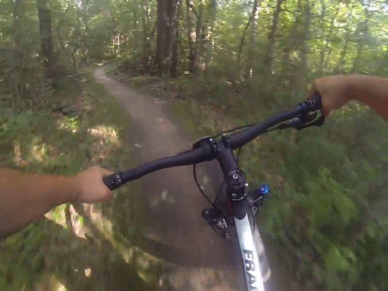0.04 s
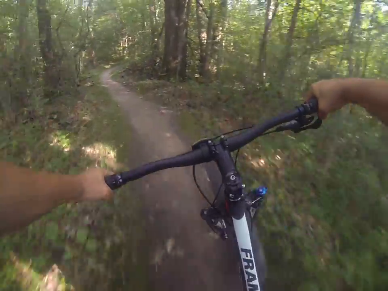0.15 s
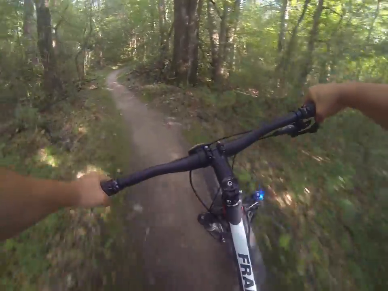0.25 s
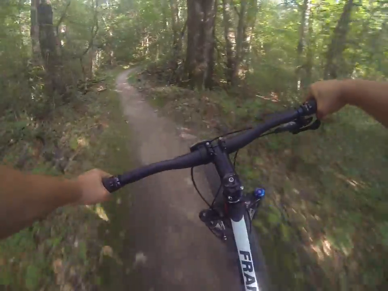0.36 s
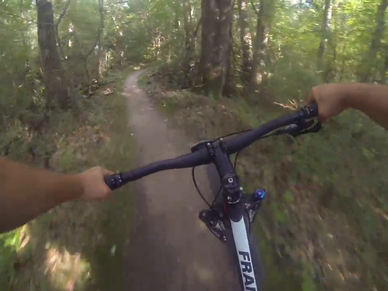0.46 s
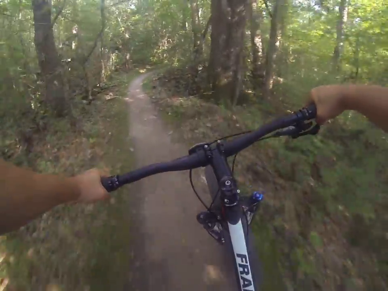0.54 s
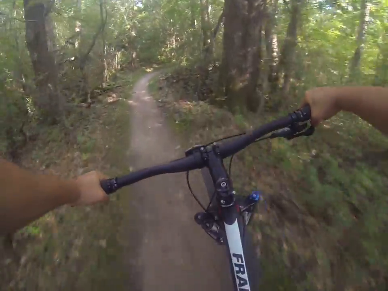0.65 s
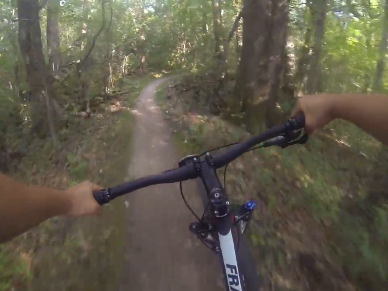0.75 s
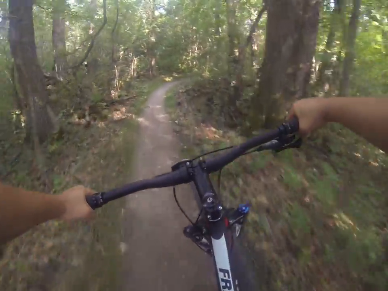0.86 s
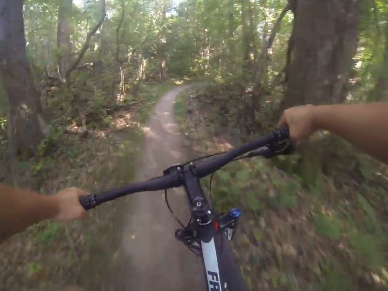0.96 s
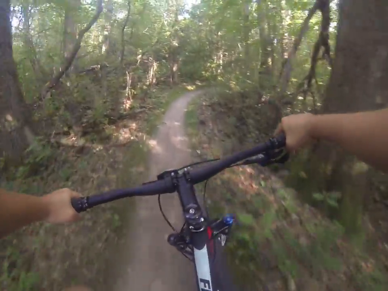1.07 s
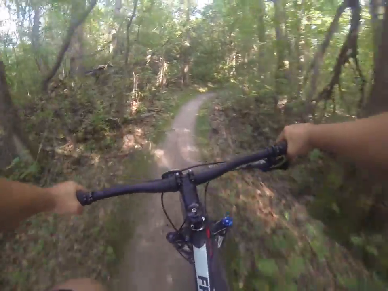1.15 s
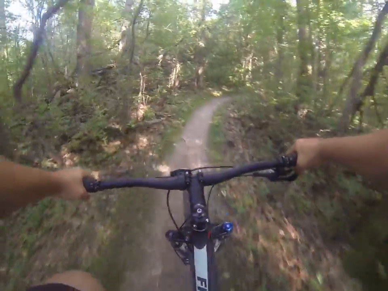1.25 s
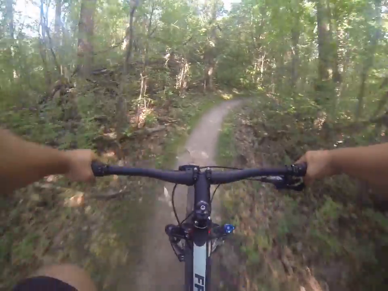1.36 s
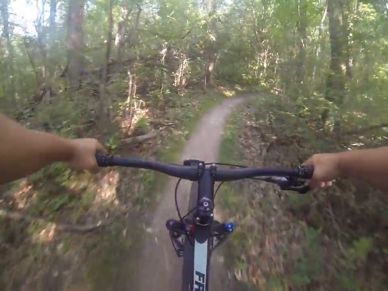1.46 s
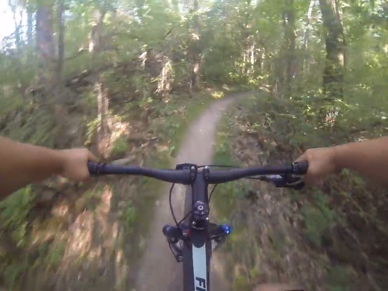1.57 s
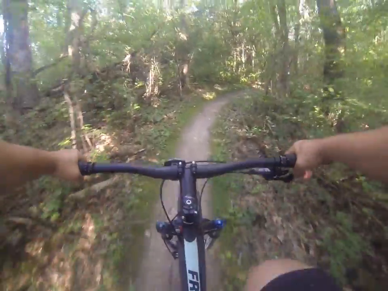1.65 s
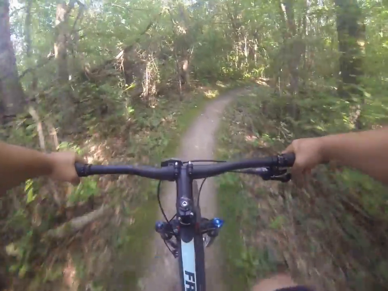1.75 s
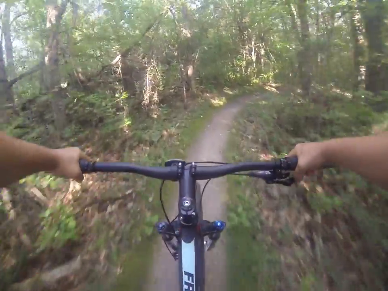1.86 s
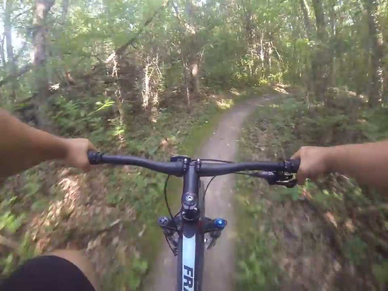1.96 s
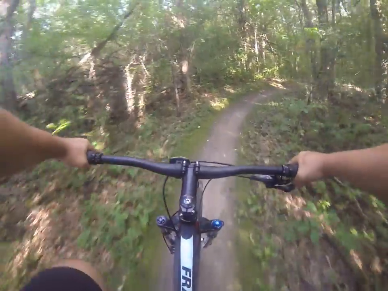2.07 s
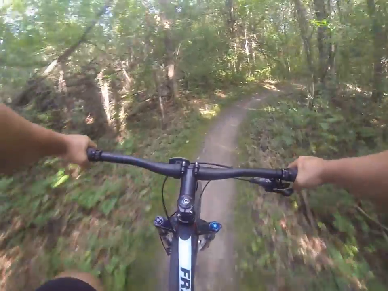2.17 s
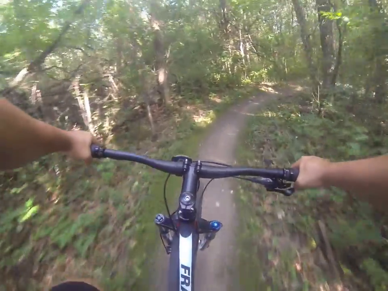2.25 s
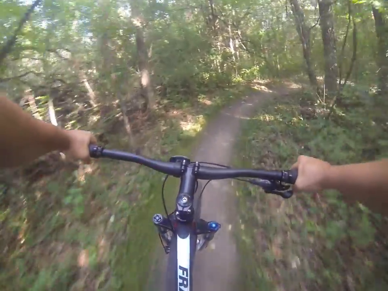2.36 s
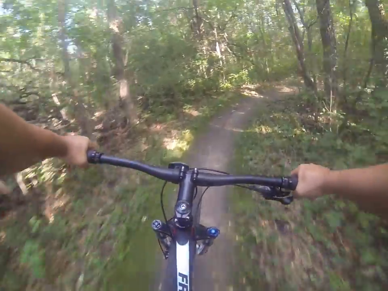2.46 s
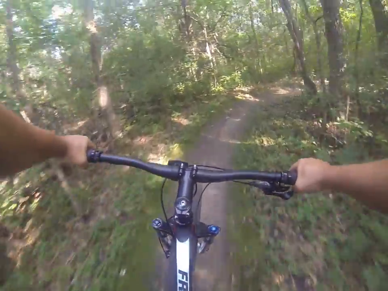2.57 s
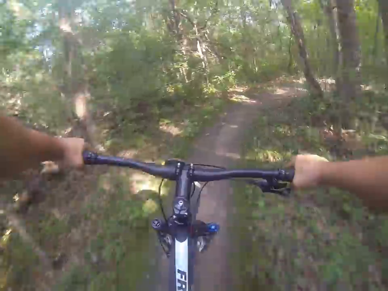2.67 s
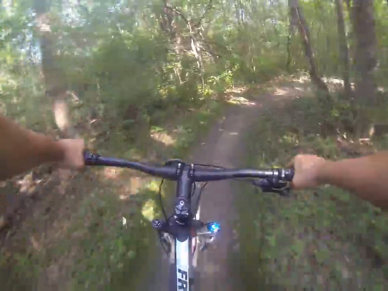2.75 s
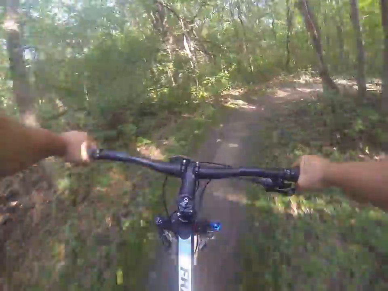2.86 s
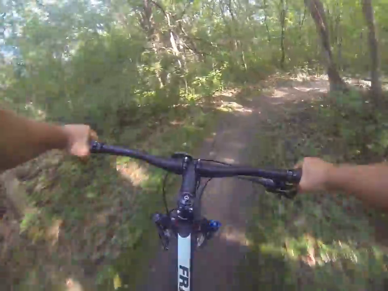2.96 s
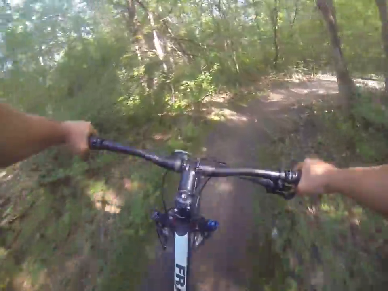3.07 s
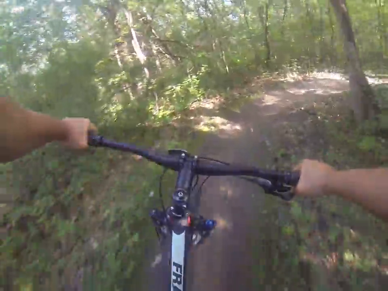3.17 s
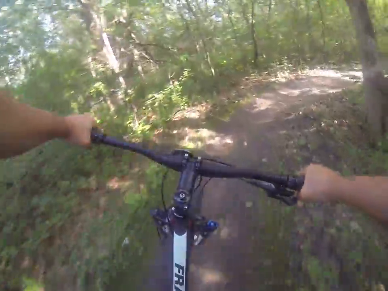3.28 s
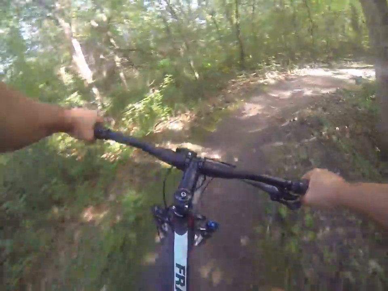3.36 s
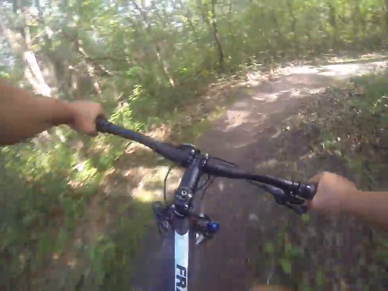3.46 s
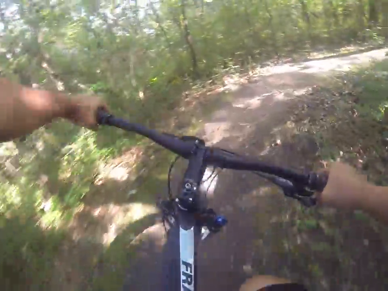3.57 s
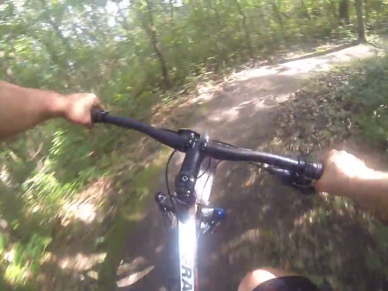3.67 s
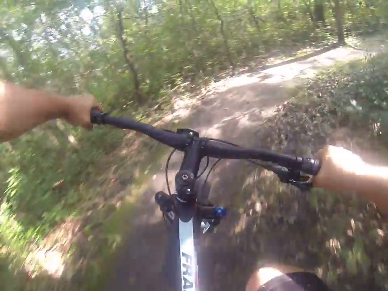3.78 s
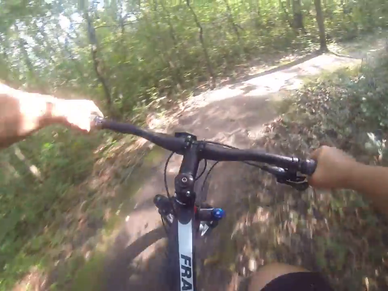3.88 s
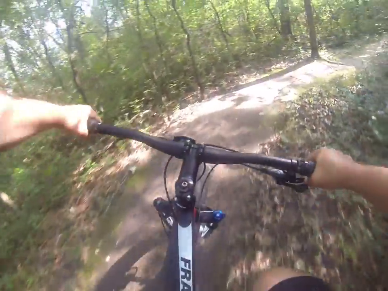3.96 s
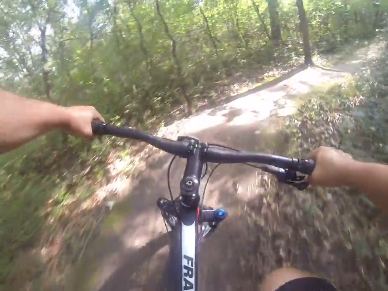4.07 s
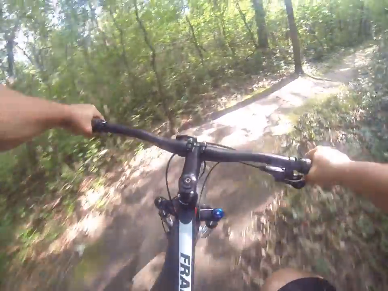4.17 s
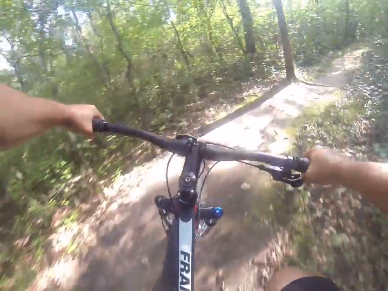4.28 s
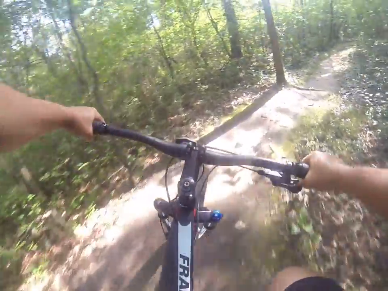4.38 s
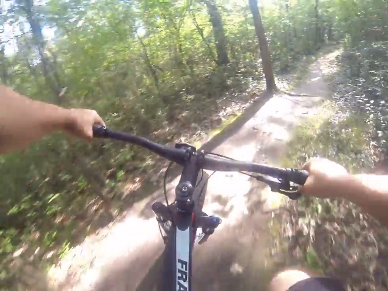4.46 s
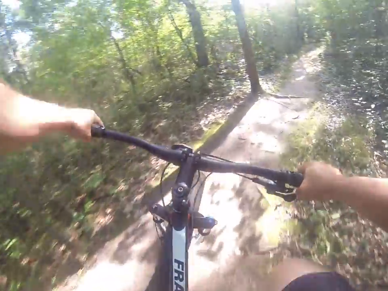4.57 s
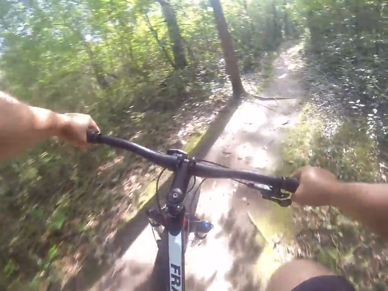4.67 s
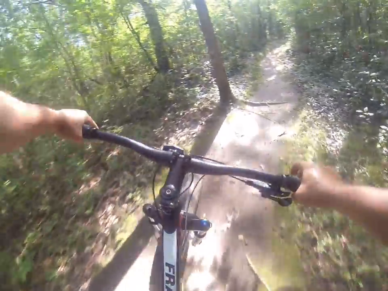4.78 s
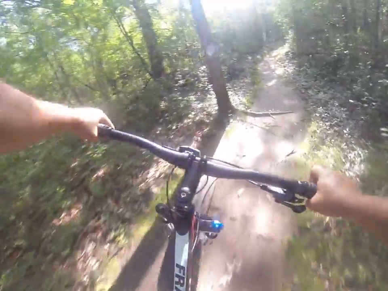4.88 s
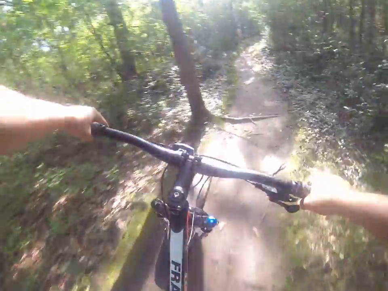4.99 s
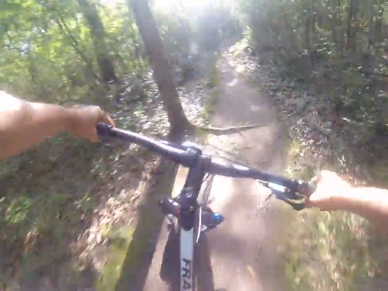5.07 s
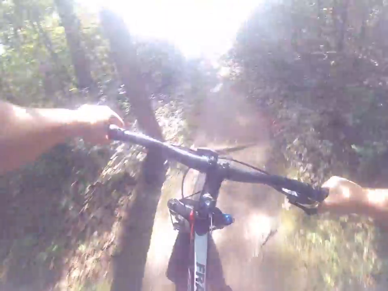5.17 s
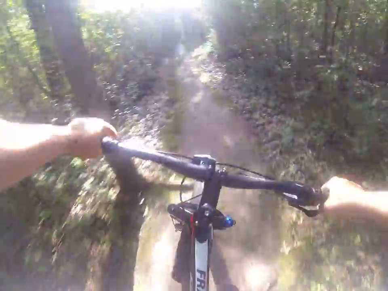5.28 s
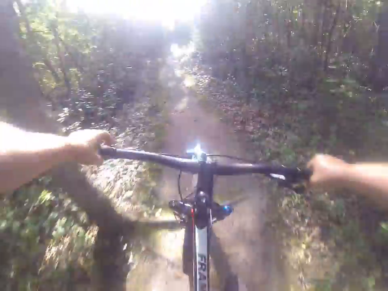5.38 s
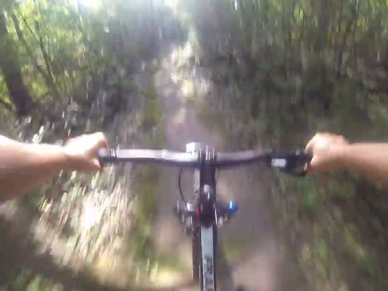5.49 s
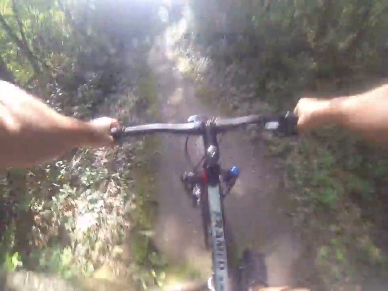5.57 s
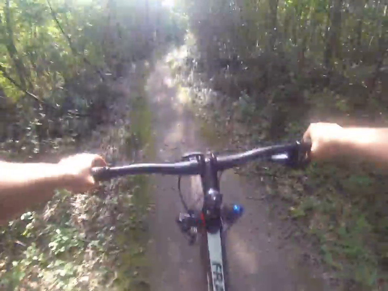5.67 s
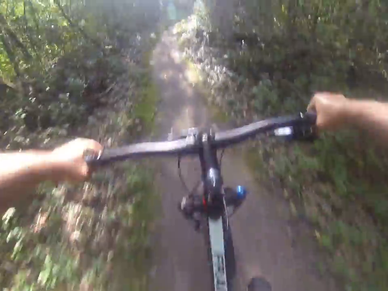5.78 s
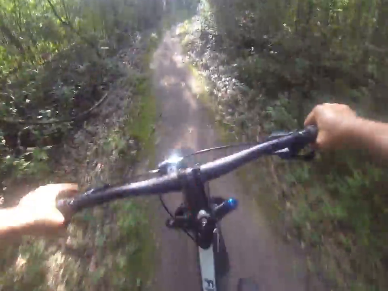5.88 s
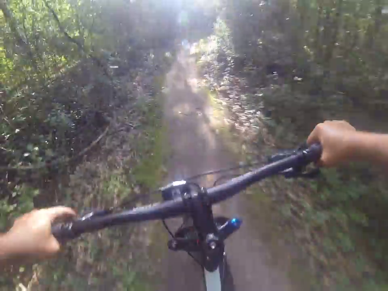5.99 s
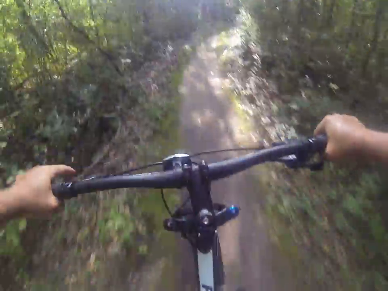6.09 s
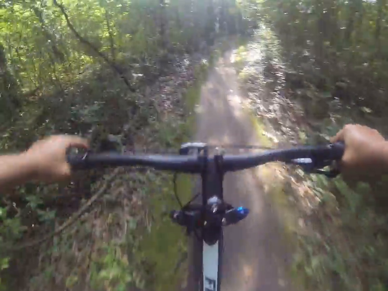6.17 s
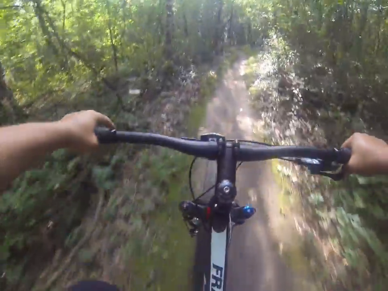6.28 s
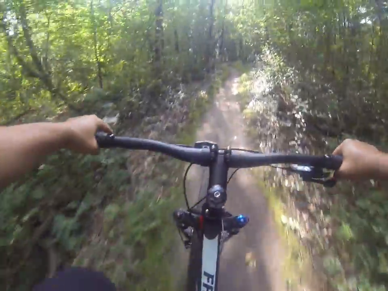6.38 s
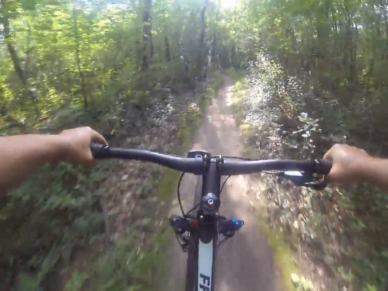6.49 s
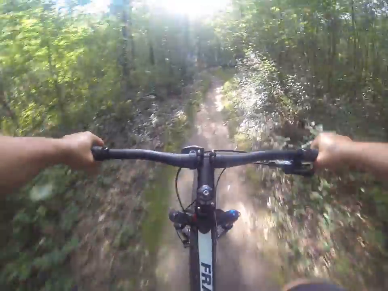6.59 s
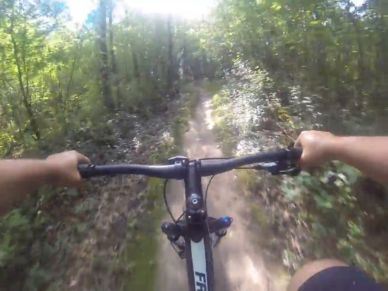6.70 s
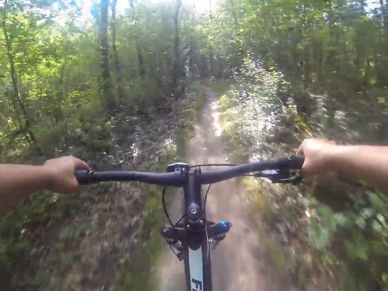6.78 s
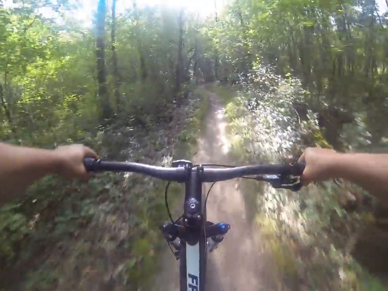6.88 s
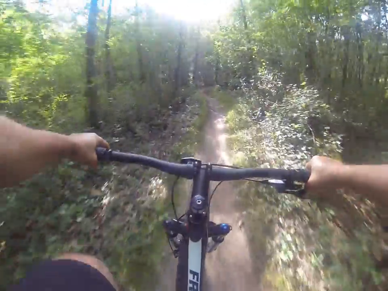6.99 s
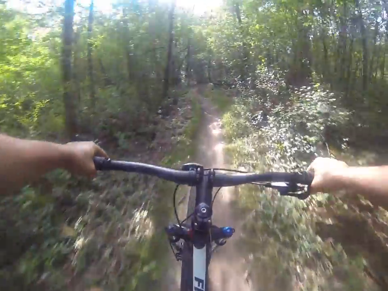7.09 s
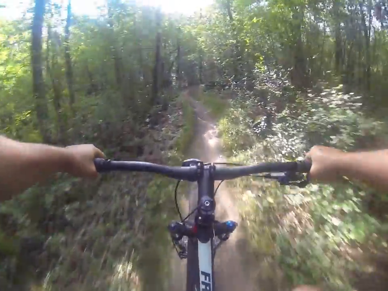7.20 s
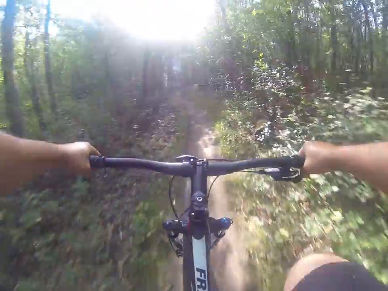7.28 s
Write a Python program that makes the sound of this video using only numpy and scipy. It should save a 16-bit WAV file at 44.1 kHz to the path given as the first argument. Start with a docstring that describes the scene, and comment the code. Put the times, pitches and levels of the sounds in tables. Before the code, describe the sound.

Close, boxy and muffled: quiet tyre grit and a dull drone, fine ratchet ticking in coasting spells, faint pulsing electronic whine and hiss. Two hollow clicks sound near one second, then a calm stretch with soft strap brushes. Past the middle a loud thud and hard plastic clatter overwhelm everything, briefly ducking the sound; smaller knocks, cloth scrapes and low thumps follow outdoors on the trail.

```python
"""A mountain bike rolls along a dirt trail, heard by a camera sealed in a plastic case on the rider's chest.
Tyre grit and knocks excite the resonances of the case; a dull drone lies under the roll.
The harness sways as an uneven low oscillation and thumps with damped swings; wind and shaking rumble.
Straps and clothing scrape as grainy friction and shake small knocks loose.
The freewheel ticks while coasting; the electronics hiss and whine faintly in bursts."""
import sys
import numpy as np
from scipy import signal
from scipy.fft import rfft, irfft
from scipy.io import wavfile
from scipy.ndimage import uniform_filter1d

SR = 44100
rng = np.random.default_rng(int(sys.argv[2]) if len(sys.argv) > 2 else 0)


def master(y):
    """Save y as 16-bit WAV."""
    cut = np.clip(np.atleast_2d(y).T, -1, 1)
    pcm = np.round(cut * 32767)  # scale
    wavfile.write(sys.argv[1], SR, pcm.astype(np.int16))


N = 323694

# Shaking of the rider: t/s, harness sway level/dB, wind and shaking rumble level/dB
BODY_MOTION = [(0.0, -22, -49.5), (0.39, -24.5, -38.5), (0.59, -14.5, -36.5), (0.73, -24.5, -39),
               (1.53, -25, -36), (2.69, -28, -46.5), (2.98, -20.5, -38.5), (3.3, -30, -43),
               (3.98, -32.5, -46), (4.18, -12, -40.5), (4.5, -27.5, -42), (5.1, -18.5, -33.5),
               (5.31, -33, -43), (5.43, -1.5, -14), (5.54, -5.5, -8.5), (5.8, -14, -28), (6.04, -8, -21),
               (6.15, -26.5, -37), (6.68, -18, -34), (6.84, -30, -35), (7.33, -21, -38)]
# Spectrum of the rumble: f/Hz, relative density level/dB (per Hz)
RUMBLE_SPECTRUM = [(13, -76), (22, -7.5), (35, -6.5), (41, -8.5), (48, -19.5), (132, -26), (300, -47.5),
                   (660, -120)]
# Tyre roll through the case: t/s, level/dB
TYRE_ROLL = [(0.0, -50.5), (0.4, -54.5), (0.92, -48), (1.3, -53), (2.3, -55), (4.65, -56), (5.37, -52.5),
             (5.55, -42), (5.67, -50.5), (7.33, -56.5)]
# Broad tyre drone through frame and rider: f/Hz, relative density level/dB (per Hz)
DRONE_SPECTRUM = [(120, -38), (200, 2), (400, -0.5), (800, -12.5), (1500, -5), (2800, -21), (4500, -30.5),
                  (7000, -33.5)]
# Resonances of case and mount: f/Hz, width/Hz, relative level/dB
CASE_MODES = [(598, 56, 1), (753, 125, -2.5), (1226, 195, 2.5), (1423.5, 73, 10), (1656, 135, 3),
              (1763, 103, 2), (2142, 210, 0.5), (2274, 145, 1), (2663, 110, -6.5), (3082, 79, -3.5),
              (3410, 86, -3), (3835, 78, -4)]
# Spells of coasting: start t/s, end t/s, mean tick rate/(1/s)
COASTING = [(0.0, 0.8, 73), (1.08, 1.29, 59), (2.04, 2.26, 45), (2.4, 4.6, 62), (4.9, 5.3, 65)]
# Spectrum of the amplifier hiss: f/Hz, relative density level/dB (per Hz)
HISS_SPECTRUM = [(2000, -0.5), (4500, -0.5), (6000, -3.5), (9500, -9.5), (11200, -5), (12300, -16),
                 (14600, -39), (15300, -37)]
# Blows on the case: t/s, peak level of the ring/dB, struck region f/Hz,
# crack level re that peak/dB, treble level re the rest of the crack/dB
KNOCK_EVENTS = [(0.1168, -33, 1390, -17, -15), (0.609, -34, 1330, -13, -13),
                (0.9582, -32.5, 1350, -30, -15), (0.9832, -18.5, 1320, -30, -10),
                (1.301, -20, 1800, -26, -20), (3.36, -37, 1360, -18, -20), (3.515, -42, 2144, -5, -25),
                (4.798, -44, 1500, 7.5, -20), (4.8893, -31.5, 1510, -1, -3.5),
                (4.9497, -34.5, 1470, -1.5, -7), (5.3837, -33, 1250, -9, -7), (5.472, -25, 1750, -8, -4.5),
                (5.5028, -26, 1940, -4, -19), (5.5203, -5.5, 1790, -18, -32), (5.529, -30, 1910, -11, -6),
                (5.5345, -9, 1950, -6.5, -6.5), (5.5485, -44, 1800, -8, -2), (5.5525, -34, 1420, -14, 6),
                (5.5625, -33, 1550, -20, -1), (5.5725, -34, 1680, -17, -4), (5.5769, -10.5, 1800, -21, -27),
                (5.6388, -22, 1890, -21, -25), (5.6434, -16.5, 1870, -33, -29),
                (5.649, -26, 1800, -29, -25), (5.6588, -15.5, 1660, -23, -27),
                (5.668, -17.5, 1880, -18, -25), (5.6734, -27.5, 970, -15.5, -1),
                (5.689, -41, 1560, -17, -23), (5.8404, -20, 1850, -18, -15),
                (5.8493, -29.5, 1770, -5.5, -4.5), (5.8745, -27, 1770, -16, -10),
                (5.8832, -32, 1550, -17, -6), (5.8903, -29, 1880, -14, -6), (5.8983, -36, 1430, -16, -7),
                (5.9103, -38, 1900, -15, -19), (5.9254, -26.5, 1980, -25, -15),
                (5.977, -33.5, 1610, -13, -21.5), (5.9958, -21.5, 1980, -26.5, -17),
                (6.0094, -26.5, 2000, -10, -12), (6.0342, -34, 1710, -20, -20.5),
                (6.1574, -31.5, 1830, -27, -23), (6.3705, -39, 1350, -17, -20), (6.405, -42, 650, -8, -25),
                (6.5804, -32.5, 1980, -30, -18), (6.6812, -31.5, 1890, -32.5, -20),
                (7.308, -38, 660, -31, -12)]
# Stiff corners of the case, rung by a crack: f/Hz, width/Hz, relative level/dB
CORNER_MODES = [(3150, 320, 6), (3910, 240, 1), (4650, 390, -3.5)]
# Clips of the case, rung by a crack: f/Hz, width/Hz, relative level/dB
CLIP_MODES = [(4920, 100, -6), (6170, 400, -4), (6760, 390, 3), (7200, 340, 1), (8570, 1200, -6),
              (12900, 1100, -13.5)]
# Jolts through the harness: t/s, peak level of the push/dB, ring f/Hz
THUD_EVENTS = [(.603, -33.5, 106), (.890, -25, 103), (.984, -33.5, 93), (1.102, -35, 111),
               (1.302, -27, 125.5), (1.395, -33.5, 156), (1.622, -29.5, 106), (1.700, -30.5, 124),
               (2.0, -37, 130), (2.83, -34, 113), (3.067, -32.5, 173), (4.646, -31.5, 102.2),
               (4.806, -37, 125), (5.376, -28.5, 152), (5.438, -13, 116), (5.472, -15.5, 165),
               (5.5, -16, 152), (5.516, -22, 196), (5.5285, -0.5, 136), (5.549, -12, 136),
               (5.578, -11.5, 111), (5.685, -9.5, 166.4), (5.909, -32, 121), (5.968, -21, 120),
               (5.997, -15, 134), (6.04, -19.5, 135), (6.305, -21, 101), (6.405, -20.5, 96.5),
               (6.502, -27, 118), (6.613, -29, 116), (6.6335, -22, 142), (6.580, -27.5, 139),
               (6.682, -26.5, 134), (6.898, -20.5, 99)]
# Straps and clothing brush the case: t/s, length/s, level/dB
SCRAPE_STROKES = [(1.308, 0.06, -51), (1.592, 0.12, -52.5), (1.908, 0.15, -54.5), (2.828, 0.11, -59.5),
                  (3.398, 0.25, -55.5), (4.787, 0.042, -49), (4.876, 0.19, -54.5), (5.361, 0.1, -44),
                  (5.447, 0.16, -34), (5.589, 0.13, -44), (5.629, 0.086, -46.5), (5.831, 0.099, -41),
                  (5.967, 0.13, -48.5), (6.491, 0.1, -49.5), (6.605, 0.072, -48.5), (6.682, 0.12, -56.5),
                  (6.883, 0.13, -53), (7.06, 0.098, -55.5)]

SWAY_HZ = 13  # centre of the wandering sway frequency
COAST_FADE_S, TICK_DB = 0.047, -64
WHINE_HZ, BURSTS_PER_S = 6440, 47.97
BURST_START, BURST_SHARE = .055, .33  # in frame periods: initial phase, time switched on
WHINE_DB, OCTAVE_DB, HISS_DB = -68.5, -75.5, -66
SPOT_WIDTH = 0.42  # width of each of three filters around a blow, as a share of its centre
RATTLE_DB, RATTLE_SPREAD_DB = 1, 11  # least level above the scrape, random range on top
RATTLE_LOW_HZ, RATTLE_HIGH_HZ = 1340, 1970
RATTLE_CRACK_DB, RATTLE_TREBLE_DB = -18, -4
EDGE_HZ = 15400  # upper band limit


def gain_of(db):
    """Level definition: amplitude ratio 10^(L/20)."""
    return 10 ** (np.asarray(db) / 20)


def evened(x):
    """Normalisation to unit rms."""
    return x / np.sqrt(np.mean(x ** 2) + 1e-20)


def curves(rows):
    """Linear interpolation of each column against t/s."""
    s, *columns = np.transpose(rows)
    return [np.interp(np.arange(N) / SR, s, c) for c in columns]


def add(mix, s, sound):
    """Superposition of a sound starting at time s."""
    part = mix[round(s * SR):][:len(sound)]
    part += sound[:len(part)]


def slow(per_s):
    """Low-pass random process: drift of unit rms, mostly slower than per_s."""
    spectrum = rfft(rng.standard_normal(N)) / (1 + (np.fft.rfftfreq(N, 1 / SR) / per_s) ** 4)
    return evened(irfft(spectrum, N))


def coloured(points):
    """Spectral shaping: noise of unit rms with the given spectrum, interpolated over log f."""
    f, db = np.transpose(points)
    hz = np.fft.rfftfreq(N, 1 / SR)
    level = np.interp(np.log(hz + 1), np.log(f + 1), db)
    return evened(irfft(rfft(rng.standard_normal(N)) * gain_of(level), N))


def resonate(x, hz, width):
    """Damped oscillator: two-pole resonance of peak gain 1."""
    b, a = signal.iirpeak(hz, hz / width, SR)
    return signal.lfilter(b, a, x)


def muffled(x, hz):
    """Low-pass filtering: a steep fourth-order treble cut."""
    return signal.sosfilt(signal.butter(N=4, Wn=hz, fs=SR, output="sos"), x)


def grit(per_s, spread_db):
    """Shot noise: random grains of uneven size, evened to unit rms."""
    size = gain_of(spread_db * np.minimum(rng.exponential(1, N), 3.5))
    struck = rng.random(N) < per_s / SR
    return evened(size * struck * rng.standard_normal(N))


def case(drive, tilt_db):
    """Modal superposition: all case modes ring at once; tilt_db per octave brightens the excitation."""
    rings = sum((-1) ** k * gain_of(db + tilt_db * np.log2(hz / 1500)) * resonate(drive, hz, width)
                for k, (hz, width, db) in enumerate(CASE_MODES))
    return evened(muffled(rings, 3090))


def sway():
    """Frequency-modulated oscillation: the camera swings unevenly on its straps, with a lopsided shape."""
    hz = SWAY_HZ * gain_of(2.9 * slow(2.485))
    angle = 2 * np.pi * (np.cumsum(hz) / SR + rng.random())
    swing = np.sin(angle) + 0.12 * slow(4.4) * np.sin(2 * angle)
    return gain_of(curves(BODY_MOTION)[0] + 2.2 * slow(7.1)) * evened(swing)


def rumble():
    """Amplitude-modulated low noise: the lumpy rumble of wind and shaking."""
    noise = coloured(RUMBLE_SPECTRUM) * gain_of(4 * slow(25))
    steady = noise / np.sqrt(uniform_filter1d(noise ** 2, 9000))  # evened over 0.2 s, lumps remain
    return gain_of(curves(BODY_MOTION)[1]) * steady


def tyres():
    """Forced vibration: dense grit under the knobs excites the case, over a duller drone."""
    drive = (grit(2500, 3.4) + 0.68 * rng.standard_normal(N)) * gain_of(slow(27))
    drone = gain_of(-4.5 + 3.5 * slow(26.3)) * coloured(DRONE_SPECTRUM)
    return gain_of(curves(TYRE_ROLL)[0]) * (case(drive, 0.1) + drone)


def freewheel():
    """Periodic impulse excitation: pawls snap over ratchet teeth and ring the hub during coasting."""
    t = np.arange(N) / SR
    coasting = sum(np.clip(np.minimum(t - start, end - t) / COAST_FADE_S, 0, 1)
                   for start, end, _ in COASTING)
    times = np.ravel([row[:2] for row in COASTING])
    per_s = np.interp(t, times, np.repeat([row[-1] for row in COASTING], 2))
    uneven = 1 + 0.034 * slow(30) + .04 * slow(1.5)
    teeth = np.diff(np.floor(np.cumsum(per_s * uneven) / SR), prepend=0)
    snaps = teeth * gain_of(2 * rng.standard_normal(N))
    hub = resonate(snaps, 3080, 72) + 0.89 * resonate(snaps, 2160, 140) + 0.5 * resonate(snaps, 1370, 130)
    return gain_of(TICK_DB + 2.5 * slow(7.2)) * coasting * evened(muffled(hub, 11000))


def electronics():
    """Gated tone and thermal-like noise: a whine on once per sensor frame, over amplifier hiss."""
    t = np.arange(N) / SR
    frame = t * BURSTS_PER_S + BURST_START
    on = uniform_filter1d(1. * (frame % 1 < BURST_SHARE), 40)
    size = gain_of(2.1 * rng.standard_normal((400, 2)))[frame.astype(int)]
    angle = 2 * np.pi * WHINE_HZ * (frame % 2) / BURSTS_PER_S  # the tone restarts every second frame
    tone = gain_of(WHINE_DB) * size[:, 0] * np.sin(angle)
    octave = gain_of(OCTAVE_DB) * size[:, 1] * np.sin(2 * angle + 1.3 * slow(40))
    hiss = gain_of(HISS_DB + 1.3 * slow(33)) * coloured(HISS_SPECTRUM)
    return on * (tone + octave) + hiss


def crack_modes(snap, modes):
    """Modal superposition of stiff parts, scaled to unit peak."""
    rings = sum(gain_of(level) * resonate(resonate(snap, f, 3 * width), f, width)
                for f, width, level in modes)
    return rings / abs(rings).max()


def knock(db, hz, crack_db, treble_db, noise):
    """Impact excitation: a soft-edged blow with rebounds rings modes near the spot; a crack adds treble."""
    t = np.arange(len(noise)) / SR
    rebounds = noise * (0.068 * np.exp(-t / 0.0036) + 0.022 * np.exp(-t / 0.0056))
    spot = (1 - np.exp(-t / 0.00006)) * (np.exp(-t / 0.00015) + rebounds)
    for _ in range(3):
        spot = resonate(spot, hz, SPOT_WIDTH * hz)
    # little rings below the struck region
    spot = signal.sosfilt(signal.butter(N=4, Wn=0.75 * hz, btype="high", fs=SR, output="sos"), spot)
    # the modes ring narrower and more evenly than under the roll
    ring = 0.67 * spot + sum(gain_of(-3.5 + 0.56 * level) * resonate(spot, f, 0.58 * width)
                             for f, width, level in CASE_MODES)
    snap = (t == 0) + 0.2 * noise * gain_of(-60 * t / 0.018)  # click, then noise falling 60 dB in 18 ms
    crack = crack_modes(snap, CORNER_MODES) + gain_of(treble_db) * crack_modes(snap, CLIP_MODES)
    return gain_of(db) * (ring / abs(ring).max() + gain_of(crack_db) * crack)


def thud(db, hz, noise):
    """Damped oscillation: straps push in and rebound, the chest swings deeper, cloth puffs dully."""
    t = np.arange(len(noise)) / SR
    start = (1 - np.exp(-t / 0.00053)) ** 2
    push = np.sin(2 * np.pi * hz * t) * start * (np.exp(-t / 0.0094) + 0.077 * np.exp(-t / 0.023))
    chest = np.sin(2 * np.pi * 62 * t) * start * np.exp(-t / 0.013)
    puff = resonate(muffled(noise, 910), 300, 260) * start * np.exp(-t / 0.0032)
    total = push / abs(push).max() + (105 / hz) ** 2 * chest + 0.086 * puff / abs(puff).max()
    return -gain_of(db) * total  # the first push is inward


def scrapes():
    """Granular friction: short strokes, brighter and wider than the roll; hard strokes add body."""
    strokes = np.zeros(N)
    for s, length, db in SCRAPE_STROKES:
        add(strokes, s, gain_of(db) * signal.windows.tukey(round(length * SR), .55))
    drive = (grit(4000, 3.1) + rng.standard_normal(N)) * gain_of(2.4 * slow(62))
    wide = evened(resonate(muffled(drive, 2980), 2460, 2650))
    force = strokes / strokes.max()
    body = evened(resonate(muffled(drive, 840), 262, 320)) * force ** 0.5
    return strokes * (evened(case(drive, 0.69) + 1.4 * wide) + 2.54 * body)


def rattles(count=7):
    """Random impacts: each scrape shakes small knocks loose; returns their rows in knock order."""
    rows = []
    for (s, length, db), draws in zip(SCRAPE_STROKES, rng.random((len(SCRAPE_STROKES), count, 3))):
        for when, size, where in draws:
            moment = s + length * (0.13 + when)
            level = db + RATTLE_DB + RATTLE_SPREAD_DB * size
            hz = RATTLE_LOW_HZ + (RATTLE_HIGH_HZ - RATTLE_LOW_HZ) * where
            rows.append((moment, level, hz, RATTLE_CRACK_DB, RATTLE_TREBLE_DB))
    return rows


def scene():
    """Linear superposition of the continuous layers and the single impacts."""
    mix = sway() + rumble() + tyres() + freewheel() + electronics() + scrapes()
    for table, sound in (KNOCK_EVENTS, knock), (THUD_EVENTS, thud), (rattles(), knock):
        for row, noise in zip(table, rng.standard_normal((len(table), 5000))):
            add(mix, row[0], sound(*row[1:], noise))
    return mix[None]


def record(dry):
    """Dynamic compression: gain control ducks around and after big jolts; overload clips; band limit."""
    power_db = 10 * np.log10(abs(uniform_filter1d(dry[0] ** 2, 3000)) + 1e-12)
    fall = np.arange(N) * 21.0 / SR  # the held level falls 21 dB per second
    held_db = np.maximum.accumulate(power_db + fall) - fall
    over_db = np.maximum(held_db + 16.0, 0)  # excess over a threshold of -16 dB
    reduction_db = 0.41 * uniform_filter1d(over_db, 600)
    ducked = np.clip(dry / gain_of(reduction_db), -.97, .97)
    band_limit = signal.firwin(511, EDGE_HZ, window=("kaiser", 9), fs=SR)
    return signal.oaconvolve(ducked, band_limit[None], "same")


dry = scene()
out = record(dry)
master(out)
```